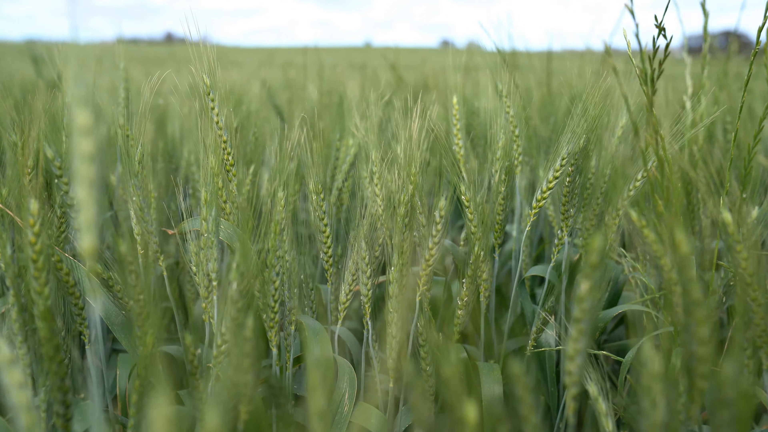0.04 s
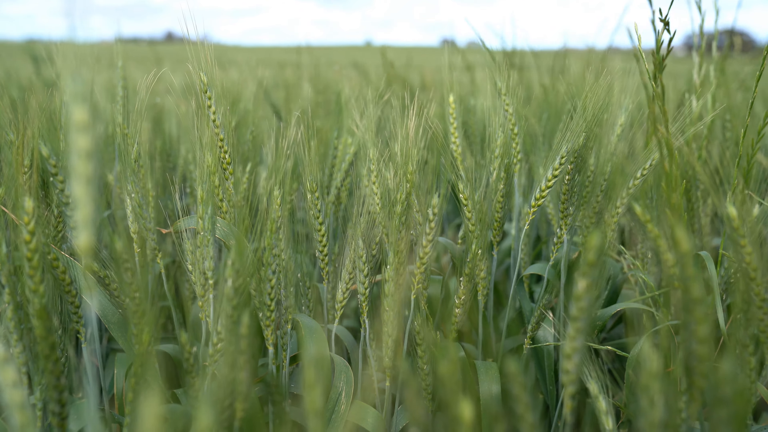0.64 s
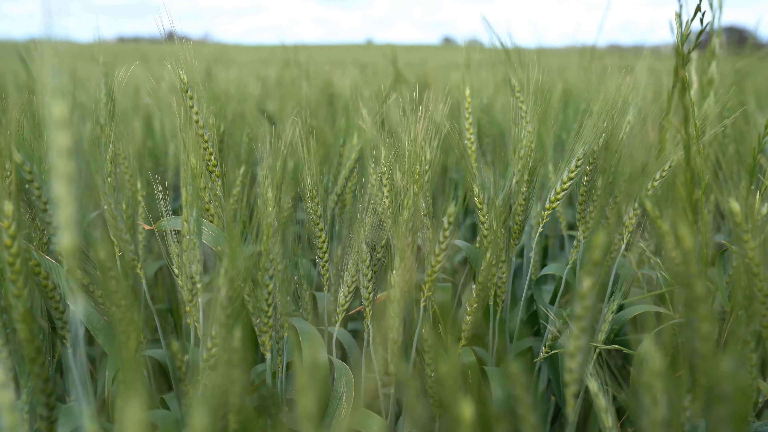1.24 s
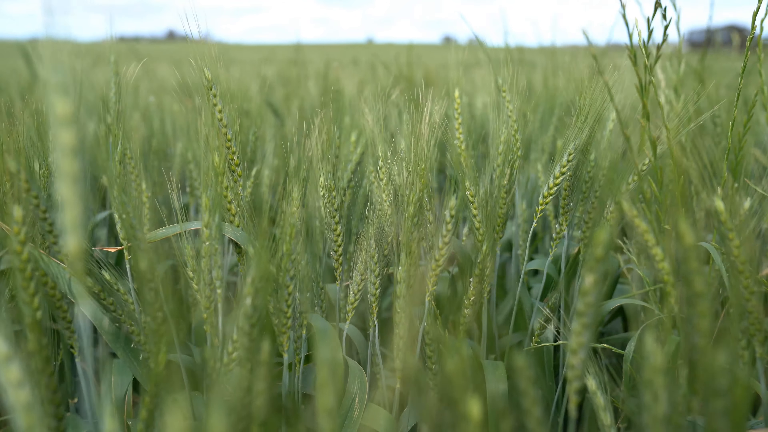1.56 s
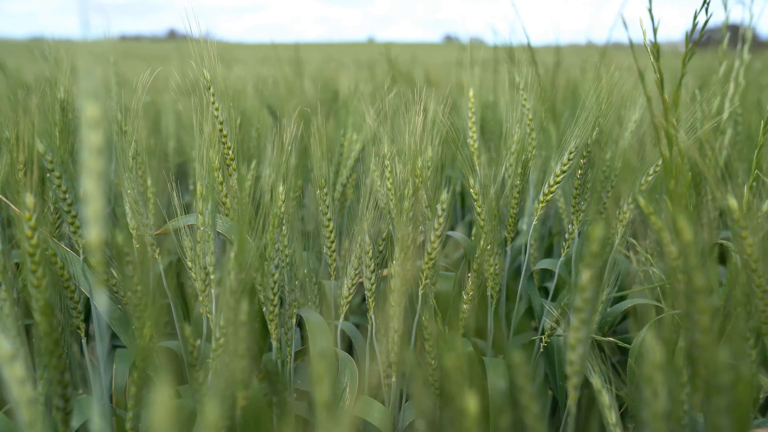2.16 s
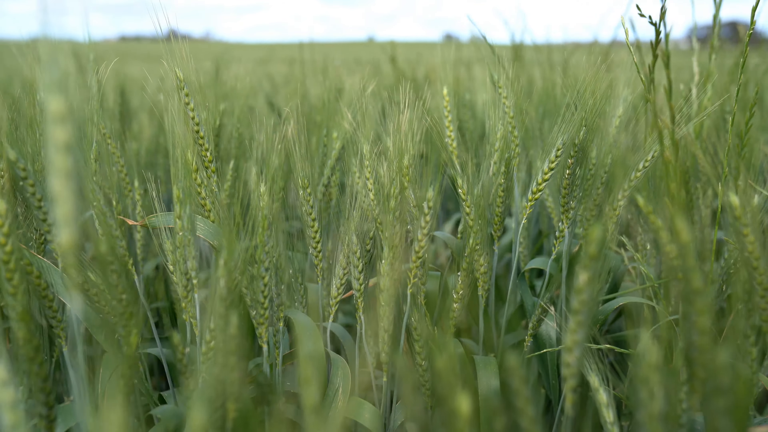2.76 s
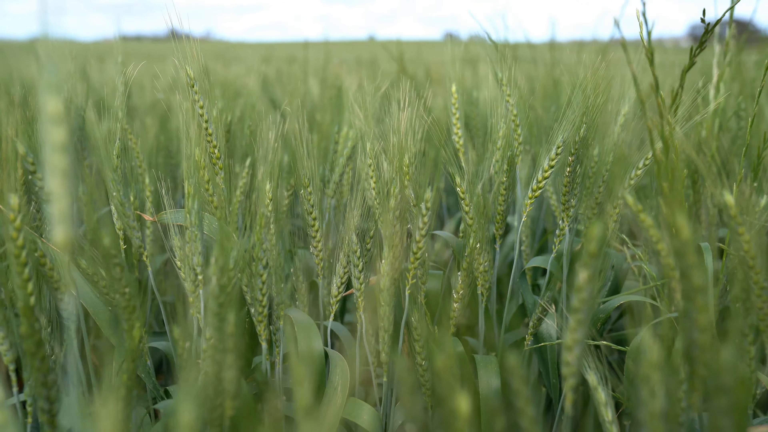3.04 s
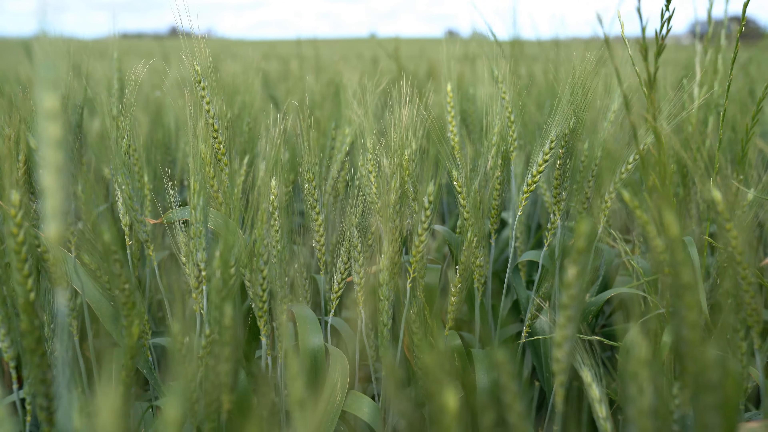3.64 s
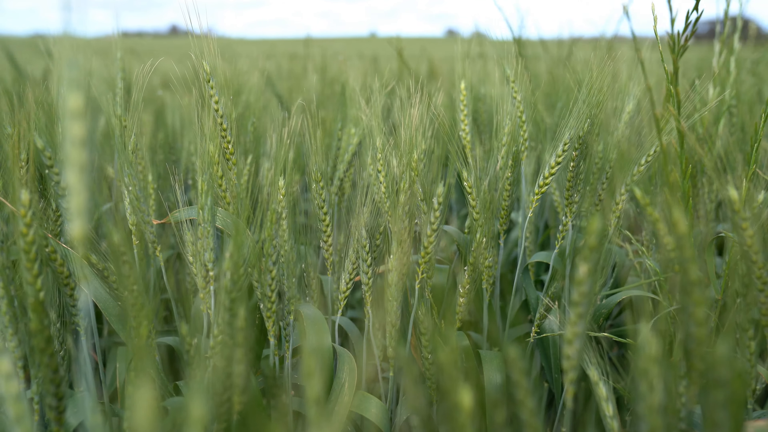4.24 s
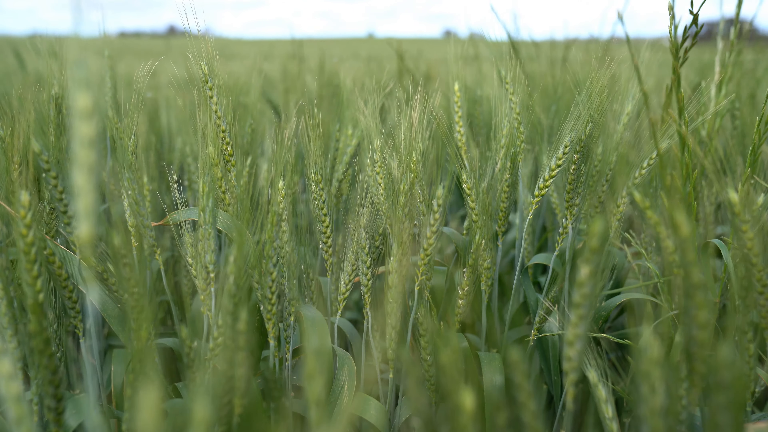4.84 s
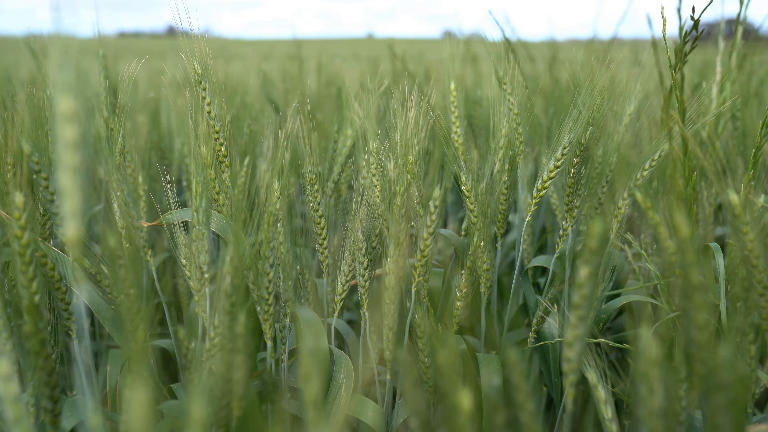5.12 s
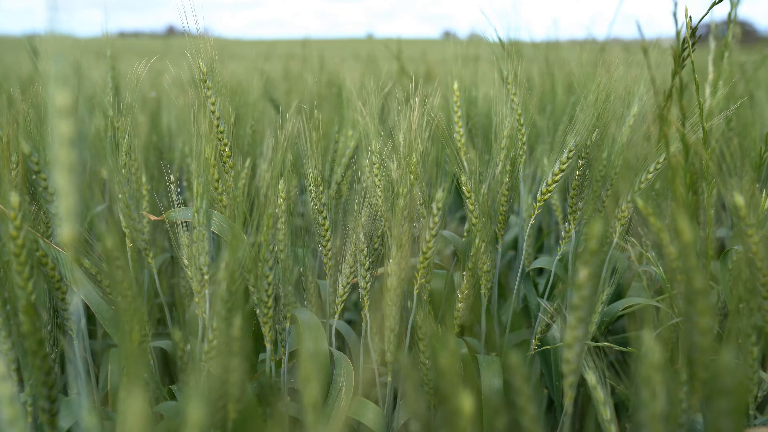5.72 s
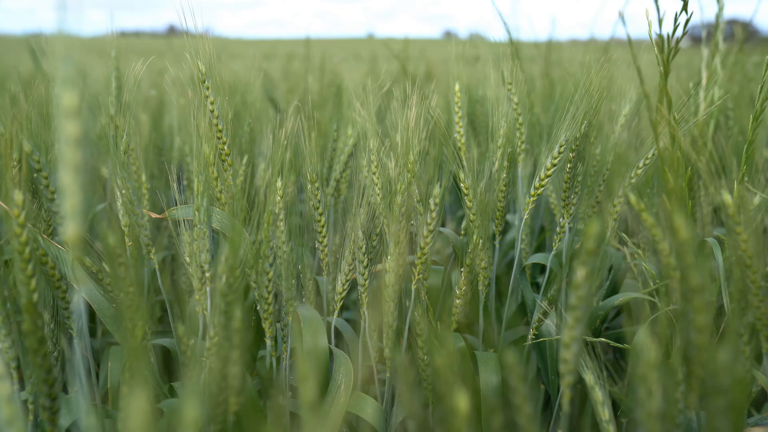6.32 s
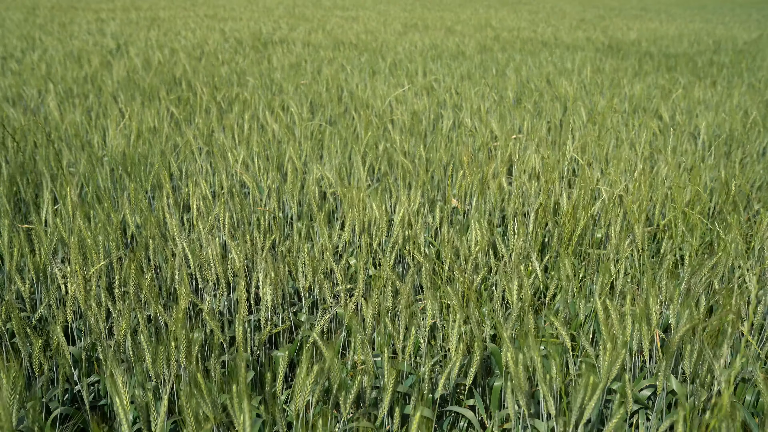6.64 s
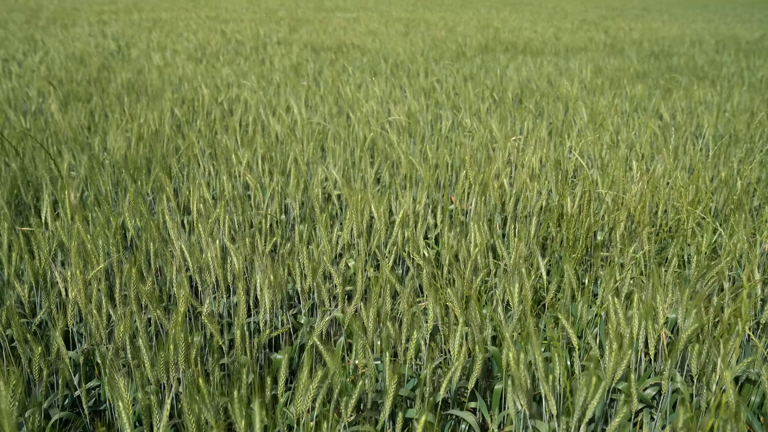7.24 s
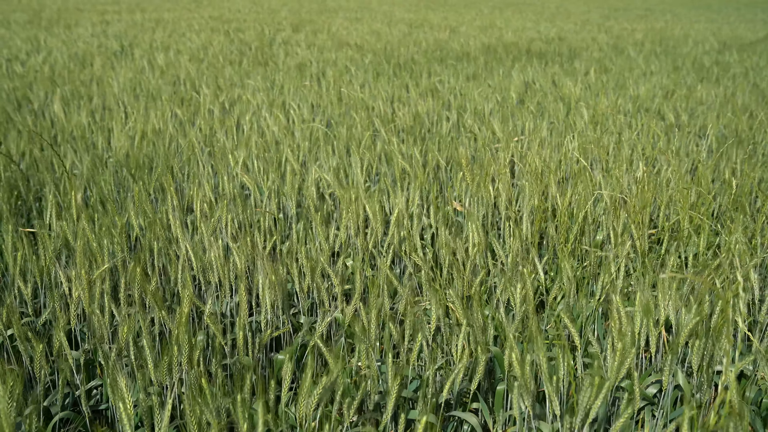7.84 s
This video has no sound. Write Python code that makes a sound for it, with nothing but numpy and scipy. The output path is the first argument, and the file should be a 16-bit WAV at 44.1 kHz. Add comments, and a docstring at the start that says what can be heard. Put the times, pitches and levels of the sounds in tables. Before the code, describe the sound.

Wheat rustles softly while low wind buffets the microphone, growing stronger near the end, with faint distant road noise.

```python
"""Gusts of wind rumble and thump on the microphone in a wheat field.
Countless ears and leaves rub into a soft rustle, and a few near ears scrape each other.
Far birds chirp, the air murmurs, and tyres on a distant road give a hollow rush on the right.
The field is heard from two spots in turn: first a sheltered one, then an open one."""
import sys
import numpy as np
from scipy import signal
from scipy.fft import rfft, irfft, next_fast_len
from scipy.io import wavfile
from scipy.ndimage import uniform_filter1d

SR = 44100
rng = np.random.default_rng(int(sys.argv[2]) if len(sys.argv) > 2 else 0)


def transcribe(signal):
    """Save signal, clipped to [-1, 1], as a 16-bit WAV file at the path in sys.argv[1]."""
    frames = np.atleast_2d(signal).T
    limited = np.clip(frames, -1, 1)
    pcm = np.round(limited * 32767).astype(np.int16)
    wavfile.write(sys.argv[1], SR, pcm)


N = 356328
TIME = np.arange(N) / SR
CHANGE_S = 6.468  # the moment the open spot takes over


def gain_of(db):
    """Turns decibels into a factor to multiply by."""
    return 10 ** (np.asarray(db) / 20)


def evened(x):
    """Scales a signal to an average power of 1."""
    return x / np.sqrt(np.mean(x ** 2) + 1e-20)


def read(points, hz):
    """Looks up a table at the frequencies hz, on a scale of octaves."""
    f, value = np.transpose(points)
    return np.interp(np.log(hz + 1), np.log(f + 1), value)


def follow(rows, t):
    """Looks up each column of a table at the times t."""
    s, *columns = np.transpose(rows)
    return [np.interp(t, s, c) for c in columns]


def sides(pan_db):
    """Left and right gains with the same total power; a pan above 0 is to the left."""
    pair = gain_of(np.array([pan_db, -pan_db]) / 2).reshape(2, -1)
    return pair / np.sqrt(np.mean(pair ** 2, axis=0))


def grid(size):
    """Times and frequencies of a sound cut into overlapping frames of size samples."""
    hop = size // 4
    return np.arange(N // hop + 2) * hop / SR, np.fft.rfftfreq(size, 1 / SR)


def noise(field_db, alike, size, lead_ms=0):
    """Stereo noise shaped over time and frequency; alike is 1 for equal sides, 0 for unrelated ones."""
    t, hz = grid(size)
    shape = (2, len(t), len(hz))
    left, other = rng.standard_normal(shape) + 1j * rng.standard_normal(shape)
    alike = np.clip(alike, -1, 1)
    delay = np.exp(-2j * np.pi * hz * lead_ms / 1000)
    right = alike * left * delay + np.sqrt(1 - alike ** 2) * other
    spectra = np.array([left.T, right.T]) * gain_of(field_db).T
    return evened(signal.istft(spectra, nperseg=size, noverlap=size * 3 // 4)[1][:, :N])


def patches(shape, frames, bins=1):
    """Random ups and downs, smoothed over time (frames) and frequency (bins)."""
    slow = uniform_filter1d(rng.standard_normal(shape), frames, axis=0)
    return evened(uniform_filter1d(slow, bins, axis=1))


def colour(x, gain):
    """Filters x: gain(f) says how much of each frequency gets through."""
    size = next_fast_len(x.shape[-1])
    return irfft(rfft(x, size) * gain(np.fft.rfftfreq(size, 1 / SR)), size)[..., :x.shape[-1]]


def contacts(per_s, spread_db):
    """Tiny clicks of uneven size at random moments, unrelated left and right."""
    size = gain_of(spread_db * np.minimum(rng.exponential(1, (2, N)), 4))
    return size * rng.standard_normal((2, N)) * (rng.random((2, N)) < per_s / SR)


def far_air(level_db=-57):
    """The steady low murmur of wind over open land."""
    # tone of the murmur: f/Hz, level/dB
    murmur = [(20, -15.5), (100, -3), (170, -5.5), (260, -7), (400, -9.5), (700, -8.5), (1400, -14),
              (3000, -24), (8000, -38)]
    hz = grid(size=2048)[1]
    return gain_of(level_db) * noise(read(murmur, hz)[None], alike=0.014, size=2048)


def road(trim_db=-0.5, pan_db=-10, patchy_db=1.0, usual_hz=820):
    """Soft ground takes the bass from far tyre roar and air takes the treble; a hollow band is left."""
    # passing traffic: t/s, level before the trim/dB, centre of the band/Hz
    traffic = [(0, -62, 786), (1.1, -60.5, 825), (3.3, -58, 820), (3.8, -60.3, 834), (4.9, -58, 840),
               (6.45, -62, 800), (6.49, -52, 795), (7.1, -51, 764), (7.38, -45.8, 825), (8.08, -51.5, 870)]
    # basic tone of the tyres when centred on usual_hz: f/Hz, level/dB
    tyres = [(250, -17.5), (480, -9.5), (600, -5.5), (700, -1.5), (800, -1.5), (900, -0.5), (960, -4.5),
             (1060, -9), (1600, -18), (3000, -43)]
    t, hz = grid(size=2048)
    level_db, centre_hz = follow(traffic, t)
    field_db = read(tyres, hz * usual_hz / centre_hz[:, None])
    # one loud vehicle gives a narrower band than the blend of many
    field_db *= np.interp(level_db, [-58, -47], [1, 1.3])[:, None]
    field_db += patchy_db * patches(field_db.shape, frames=10, bins=4)
    roar = noise(field_db, alike=0.36, size=2048)
    return gain_of(follow(traffic, TIME)[0] + trim_db) * sides(pan_db) * roar


def bird(pan_db=-6):
    """Short gliding whistles in pairs, one down and one up."""
    # chirps: start t/s, level/dB, length/s, first f/Hz, last f/Hz
    chirps = [(4.164, -57, .016, 5330, 5150), (4.206, -57, .016, 5200, 5240),
              (4.653, -45, 0.029, 2400, 2080), (4.716, -48.5, .024, 2340, 2500)]
    song = np.zeros(N)
    for s, db, length, first_hz, last_hz in chirps:
        progress = np.clip((TIME - s) / length, 0, 1)
        pitch_hz = first_hz + (last_hz - first_hz) * progress
        song += gain_of(db) * np.sin(np.pi * progress) * np.sin(2 * np.pi * np.cumsum(pitch_hz) / SR)
    return sides(pan_db) * song


def scrapes(width_hz=1300):
    """The barbed bristles of near ears slide over each other: a short run of high, papery clicks."""
    # scrapes: peak t/s, level/dB, half-length/s, centre f/Hz, pan/dB
    rubs = [(1.984, -51, .008, 10800, 12), (3.688, -58.5, 0.014, 10900, 6), (3.745, -60, 0.018, 11000, 3),
            (4.295, -56, .004, 10800, -16)]
    out = np.zeros((2, N))
    barbs = contacts(per_s=6100, spread_db=6.0)
    for s, db, length, centre_hz, pan_db in rubs:
        near = abs(TIME - s) < .1
        rasp = evened(colour(barbs[:, near], lambda f: 1 / (1 + ((f - centre_hz) / width_hz) ** 2)))
        swell = np.exp(-.5 * ((TIME[near] - s) / length) ** 2)
        out[:, near] += gain_of(db) * sides(pan_db) * rasp * swell
    return out


def wheat(wash_db=3, ticks_db=-8, patchy_db=.5, flutter_db=0.34, usual_treble_db=-3.0):
    """Far stalks merge into a wash, near ones tick; both swell as the crop sways."""
    # sway of the crop: t/s, base level/dB, treble/dB, pan/dB
    sway = [(0, -57.5, -1, 1), (.95, -55.5, -2, .1), (1.3, -52.5, -1.8, 0.5), (1.7, -51, -1.1, 3),
            (2.75, -52.5, -2, 4.5), (3.5, -55, -2.4, 2), (5.1, -55.5, -1.7, 2.1), (6.45, -57.5, -1, 1.8),
            (6.49, -51.6, -1.5, 1), (7.3, -51.5, -3, 2.3), (8.08, -51, -3, 3)]
    # tone of the rustle: f/Hz, level/dB
    rustle = [(300, -18.5), (600, -4), (1100, -2.5), (1800, -3.5), (2500, -0.3), (3300, 0), (4300, -1.5),
              (5500, -4.5), (7000, -5), (9000, -7), (11000, -7.5), (13000, -9), (15500, -12.5)]
    # how alike left and right are: f/Hz, likeness
    alike = [(300, 0.3), (1400, 0.33), (3000, 0.31), (5000, 0.29), (7500, 0.13), (10500, 0.34),
             (15000, .15)]
    t, hz = grid(size=512)
    treble_db = follow(sway, t)[1][:, None] - usual_treble_db
    field_db = read(rustle, hz) + treble_db * read([(4000, 0), (9000, 1)], hz)
    # clumps of stalks brush in turn, each with its own tone
    field_db += patchy_db * patches(field_db.shape, frames=24, bins=36)
    field_db += flutter_db * patches((len(t), 1), frames=16)
    wash = noise(field_db, read(alike, hz), size=512, lead_ms=0.047)
    clicks = contacts(per_s=1600, spread_db=3)
    ticks = evened(colour(clicks, lambda f: gain_of(read(rustle, f)) * f / (f + 2000)))
    level_db, _, pan_db = follow(sway, TIME)
    return gain_of(level_db) * sides(pan_db) * (gain_of(wash_db) * wash + gain_of(ticks_db) * ticks)


def thumps(low_hz=90, swing_db=13, swing_s=0.0068):
    """One swirl of air hits the microphone: a swing from suction to pressure inside a dull puff."""
    # single swirls: peak t/s, puff level/dB, half-length/s, top f/Hz, pan/dB
    hits = [(1.275, -43, 0.018, 170, -1), (1.427, -42, 0.016, 157, 7), (2.792, -48, 0.014, 110, -4),
            (5.119, -52, 0.011, 130, -3), (5.835, -46, 0.014, 170, -13), (6.383, -44.5, 0.0095, 274, 6),
            (6.448, -46.5, 0.028, 217, 5), (7.199, -29.5, 0.014, 183, -8), (7.376, -28.5, 0.011, 128, -6),
            (7.403, -30.5, 0.014, 181, -5), (7.643, -32.5, 0.014, 172, -1.5), (8.07, -43, 0.0082, 230, 3)]
    out = np.zeros((2, N))
    for s, db, length, top_hz, pan_db in hits:
        near = abs(TIME - s) < .1
        t = TIME[near] - s
        swell = np.exp(-.5 * (t / length) ** 2)
        hiss = rng.standard_normal((2, len(t)))
        puff = swell * colour(hiss, lambda f: f ** 2 / (f ** 2 + low_hz ** 2) / (1 + (f / top_hz) ** 4))
        puff *= np.sqrt(np.mean(swell ** 2) / np.mean(puff ** 2))
        swing = gain_of(swing_db) * t / swing_s * np.exp(-.5 * (t / swing_s) ** 2)
        out[:, near] += gain_of(db) * sides(pan_db) * (puff + swing)
    return out


def wind(t, build_s=0.31, rise_share=0.69):
    """Gusts swell and die over a breeze; returns the level in dB, the pan in dB and the swirl size."""
    # gusts: peak t/s, level/dB, fall time/s, swirl size (1 = usual), pan/dB
    gusts = [(0.02, -39, 0.11, 1.06, 0), (0.708, -37.5, 0.065, 0.91, -1), (0.913, -33, .13, .95, -1),
             (1.287, -20.5, 0.043, 1.07, 0), (1.394, -24.5, 0.044, 0.86, -7),
             (2.315, -41.5, 0.034, 0.96, -6), (2.783, -24, 0.048, 0.99, -1.5),
             (3.006, -27.5, 0.041, 1.04, -1), (3.553, -33, 0.062, 1.25, 1), (4.14, -36.5, 0.13, 0.9, -1.5),
             (4.762, -37.5, 0.051, 1.1, 0), (5.062, -38.5, 0.099, 0.97, 4), (5.352, -31.5, 0.097, 1.06, 3),
             (5.622, -27, .05, 1.16, -3), (5.833, -27, 0.035, 0.8, -1), (6.047, -36, 0.13, 1.03, -3),
             (6.603, -30, 0.065, 1.18, -1), (6.875, -20, 0.073, 0.88, -2.5),
             (7.193, -14, 0.028, 0.93, -1.5), (7.405, -16.5, 0.057, 0.91, -5),
             (7.667, -25, 0.16, 1.06, -5.5)]
    opened = np.clip((t - CHANGE_S) / build_s, 0, 1)  # the breeze picks up at the open spot
    breeze_db = np.interp(opened, [0, 1], [-47, -29])
    breeze_pan_db = np.interp(opened, [0, 1], [1, -3])
    power = (gain_of(breeze_db) * sides(breeze_pan_db)) ** 2
    sizes = power.mean(0)
    for s, db, fall_s, swirl_size, pan_db in gusts:
        away = np.maximum((s - t) / rise_share, t - s) / fall_s
        gust = gain_of(db) ** 2 * np.exp(-away ** 1.08)  # 1 gives a pointed peak, 2 a round one
        power += gust * sides(pan_db) ** 2
        sizes += gust * swirl_size
    return 10 * np.log10(power.mean(0)), 10 * np.log10(power[0] / power[1]), sizes / power.mean(0)


def rumble(trim_db=0.4, slide=0.094, usual_db=-35, lumpy_db=3, flutter_db=2.5, steady_db=-24):
    """Air swirls on the microphone: faster air and smaller swirls pass sooner, so they sound higher."""
    # tone of the rumble at the usual speed: f/Hz, level/dB
    tone = [(5, -9), (15, 1.5), (28, 5.5), (42, -5), (60, -10), (80, -14), (110, -21), (170, -31.5),
            (260, -34.5), (500, -41), (1500, -99)]
    # how alike left and right are: f/Hz, likeness (below 0 they move against each other)
    alike = [(25, 0.66), (65, 0.38), (130, -0.35), (290, -0.76)]
    t, hz = grid(size=4096)
    level_db, _, swirl_size = wind(t)
    speed = gain_of(level_db - usual_db) ** slide / swirl_size
    speed *= np.where(t > CHANGE_S, 1.26, 1)  # the open spot lacks the shelter of the crop
    swirls = noise(read(tone, hz / speed[:, None]), read(alike, hz), size=4096)
    # rough air comes in lumps, each a few hundredths of a second long
    t = grid(size=512)[0]
    lumps = np.interp(TIME, t, patches((len(t), 1), frames=12)[:, 0])
    swirls *= gain_of(lumpy_db * lumps)
    # even out the slow changes, so that the gusts set the strength
    slow_power = uniform_filter1d(uniform_filter1d((swirls ** 2).mean(0), size=3000), size=2000)
    swirls /= np.sqrt(slow_power + 1e-9)
    level_db, pan_db, _ = (np.interp(TIME, t, curve) for curve in wind(t))
    # the air flutters several times a second, mostly in light wind
    flutter = np.interp(TIME, t, patches((len(t), 1), frames=24)[:, 0])
    level_db += flutter_db * flutter / (1 + gain_of(level_db - steady_db))
    gusting = gain_of(level_db + trim_db) * sides(pan_db) * swirls
    return colour(gusting, lambda f: 1 / (1 + (f / 450) ** 4))  # keep the bass, below 450 Hz


def scene():
    """The field, the far sounds and the wind on the microphone, added together."""
    return wheat() + scrapes() + bird() + far_air() + road() + rumble() + thumps()


def record(dry, fade_out_s=0.016, fade_in_s=0.023, dip_db=-24, top_hz=15800):
    """The level dips briefly between the two spots, and the highest treble is cut off."""
    away = np.maximum((CHANGE_S - TIME) / fade_out_s, (TIME - CHANGE_S) / fade_in_s)
    faded = dry * np.clip(away, gain_of(dip_db), 1)
    low_pass = signal.firwin(511, top_hz, window=("kaiser", 9), fs=SR)
    return signal.oaconvolve(faded, low_pass[None], "same")


dry = scene()
out = record(dry)
transcribe(out)
```